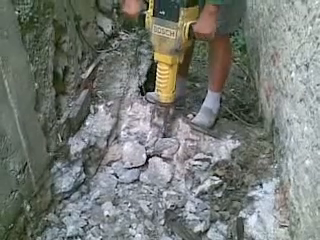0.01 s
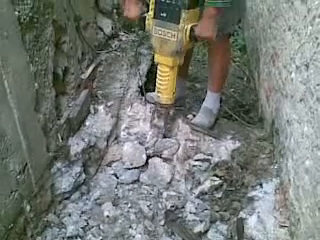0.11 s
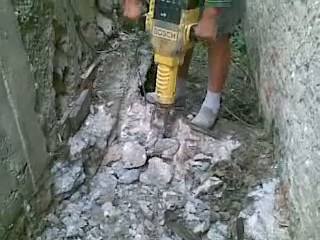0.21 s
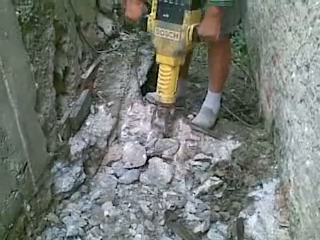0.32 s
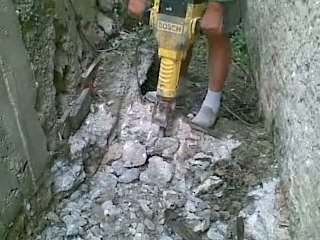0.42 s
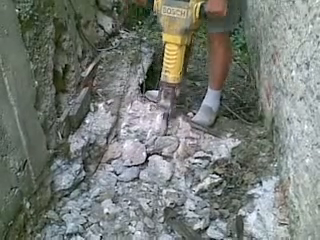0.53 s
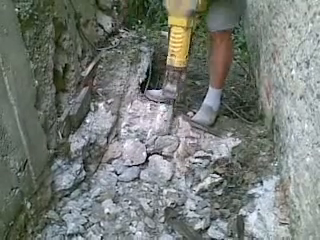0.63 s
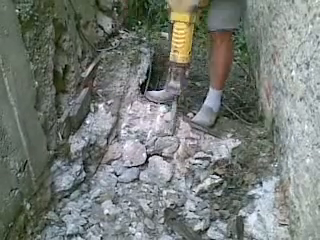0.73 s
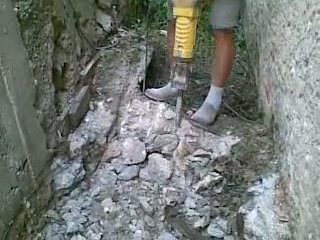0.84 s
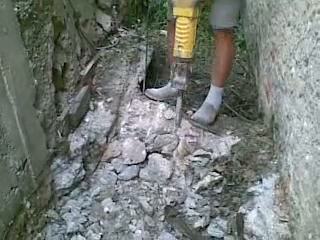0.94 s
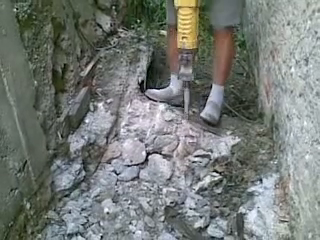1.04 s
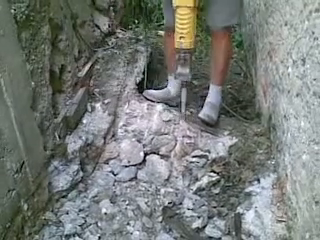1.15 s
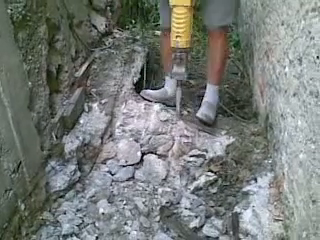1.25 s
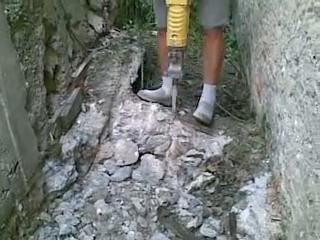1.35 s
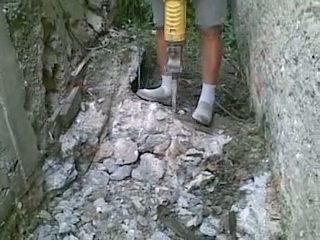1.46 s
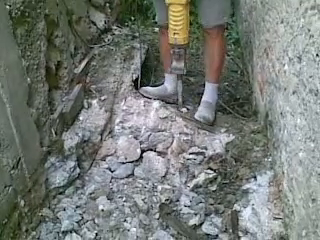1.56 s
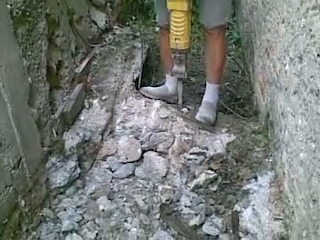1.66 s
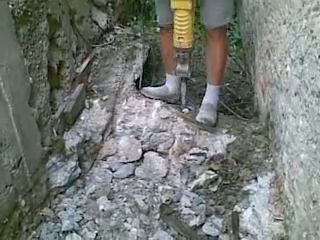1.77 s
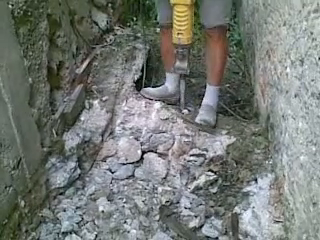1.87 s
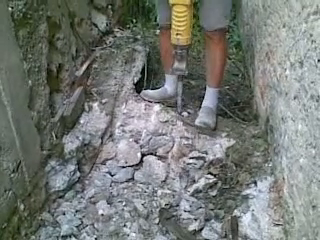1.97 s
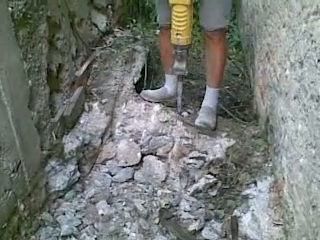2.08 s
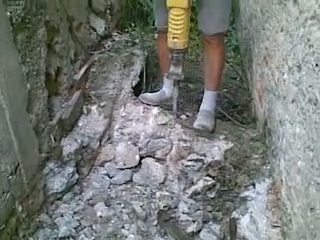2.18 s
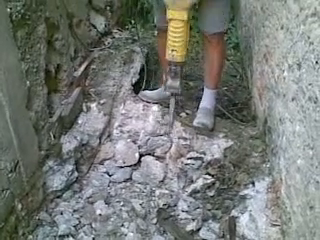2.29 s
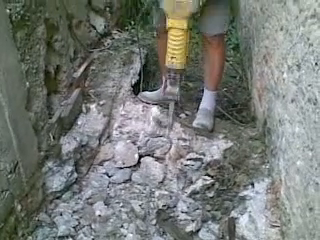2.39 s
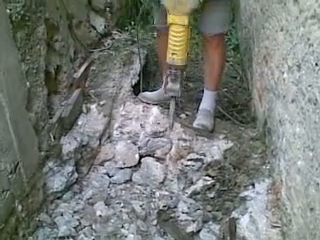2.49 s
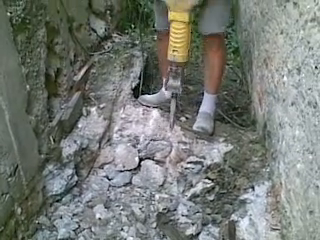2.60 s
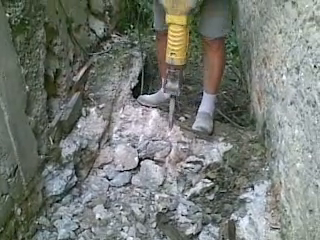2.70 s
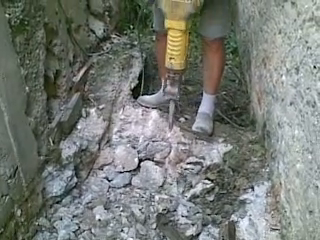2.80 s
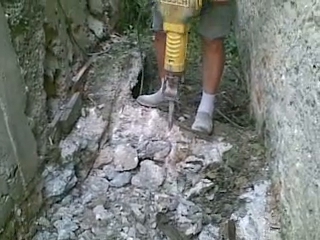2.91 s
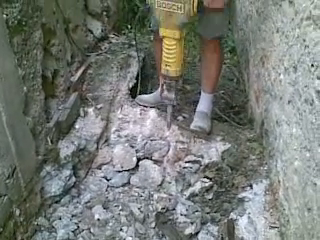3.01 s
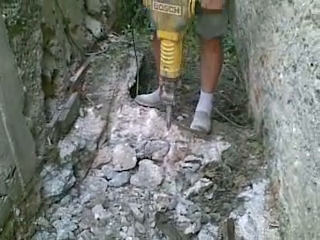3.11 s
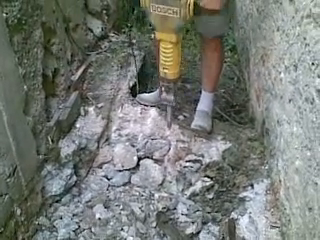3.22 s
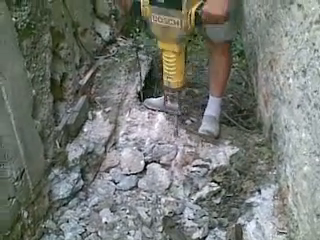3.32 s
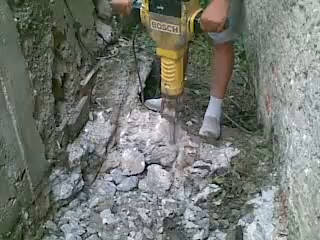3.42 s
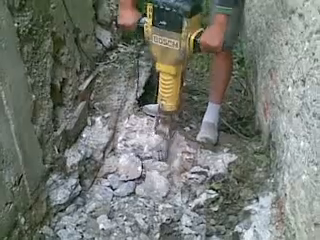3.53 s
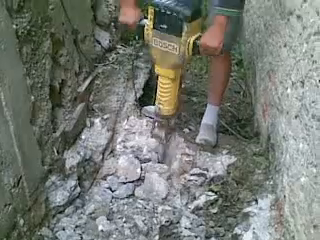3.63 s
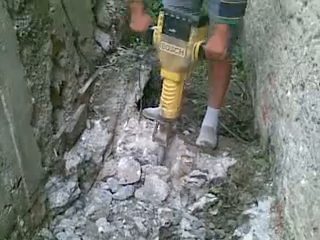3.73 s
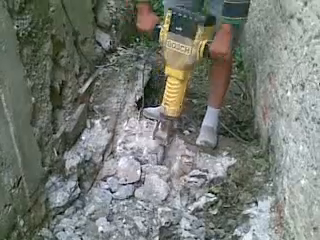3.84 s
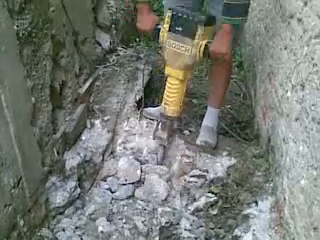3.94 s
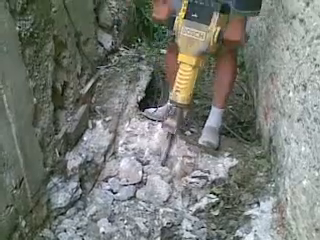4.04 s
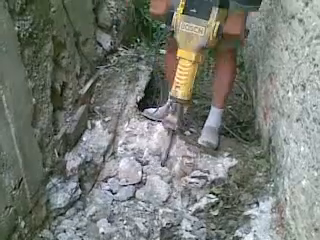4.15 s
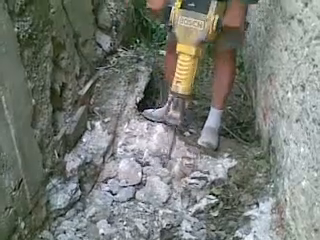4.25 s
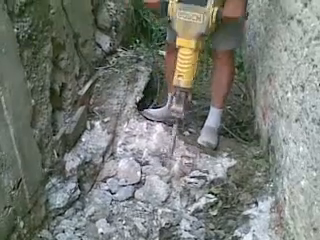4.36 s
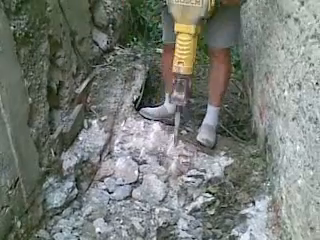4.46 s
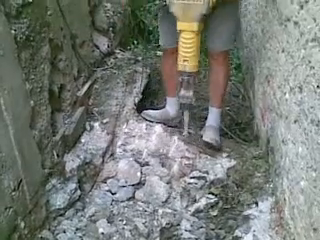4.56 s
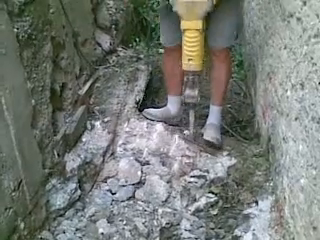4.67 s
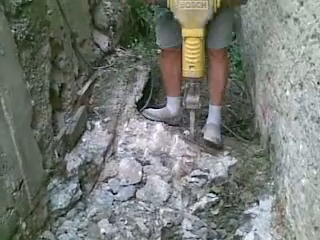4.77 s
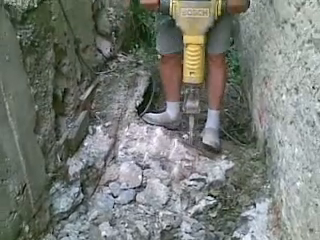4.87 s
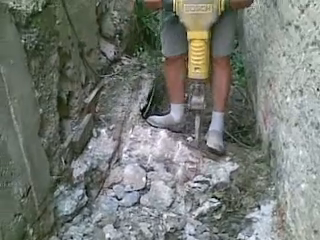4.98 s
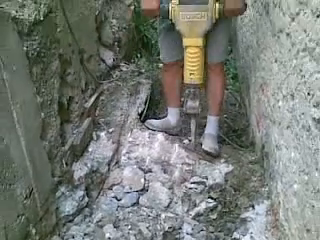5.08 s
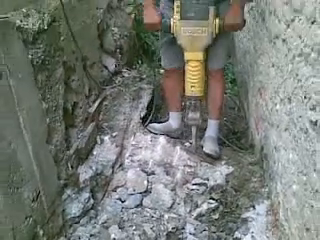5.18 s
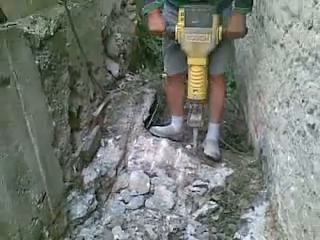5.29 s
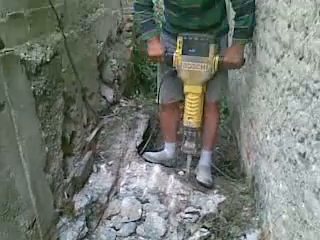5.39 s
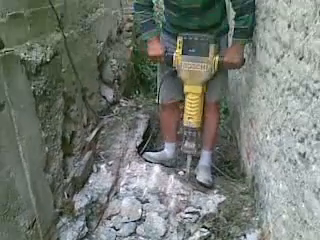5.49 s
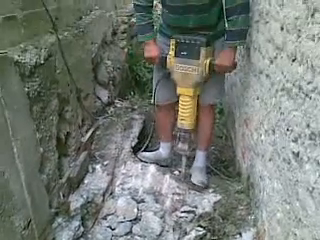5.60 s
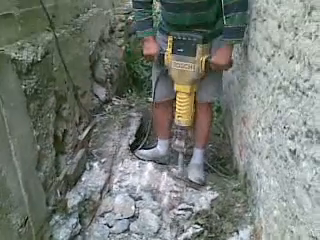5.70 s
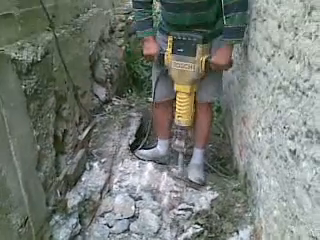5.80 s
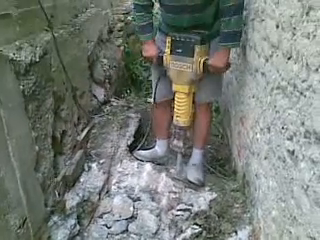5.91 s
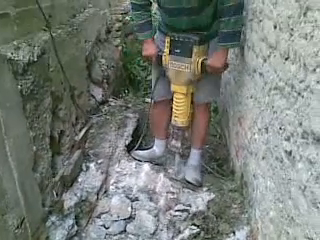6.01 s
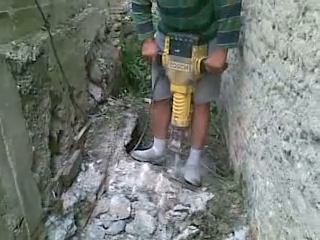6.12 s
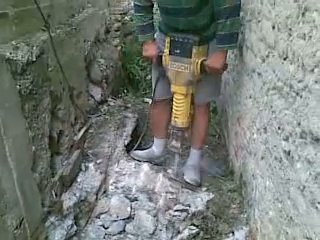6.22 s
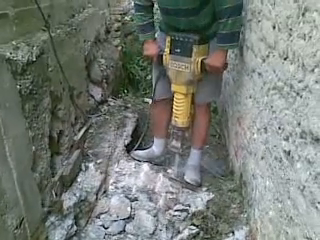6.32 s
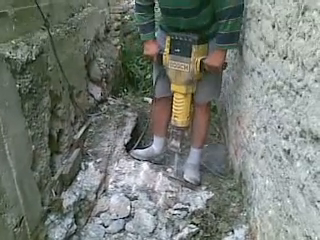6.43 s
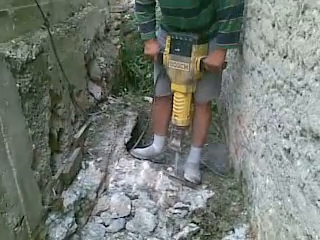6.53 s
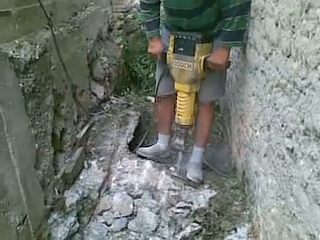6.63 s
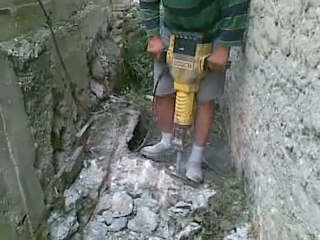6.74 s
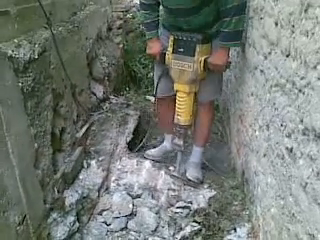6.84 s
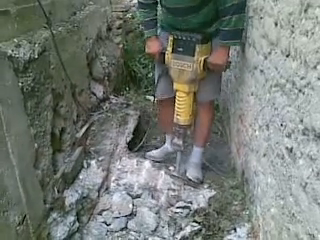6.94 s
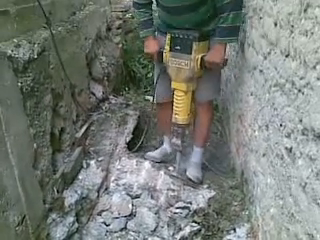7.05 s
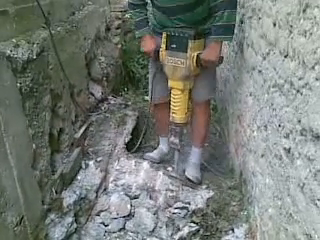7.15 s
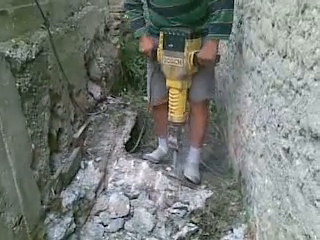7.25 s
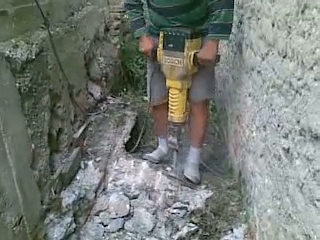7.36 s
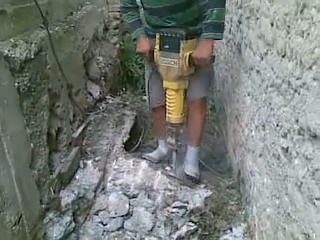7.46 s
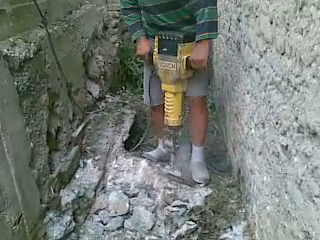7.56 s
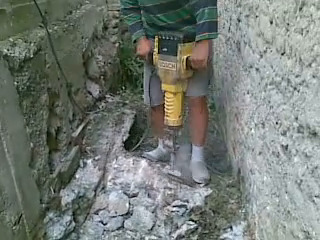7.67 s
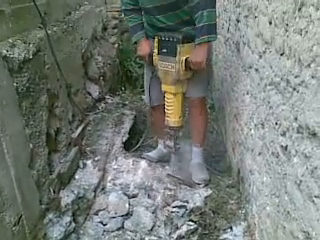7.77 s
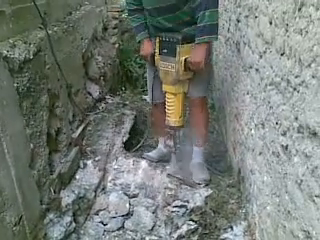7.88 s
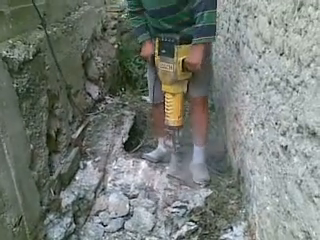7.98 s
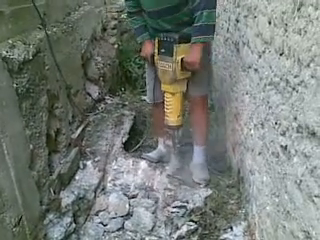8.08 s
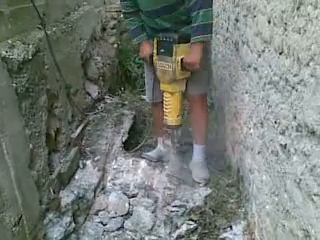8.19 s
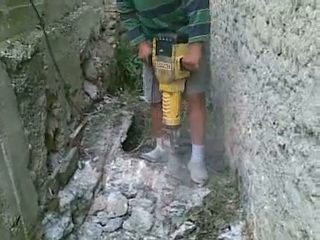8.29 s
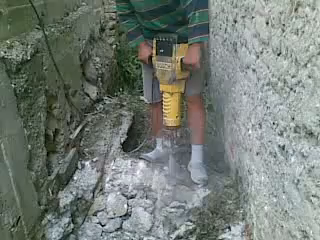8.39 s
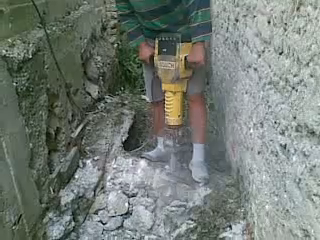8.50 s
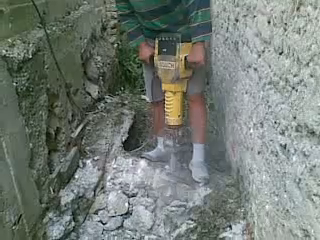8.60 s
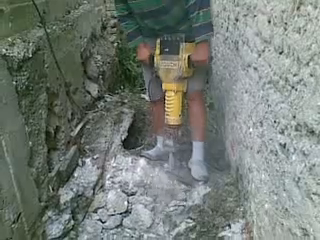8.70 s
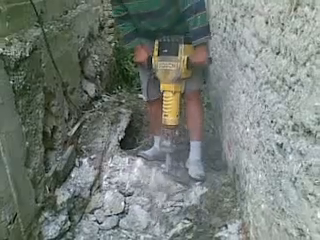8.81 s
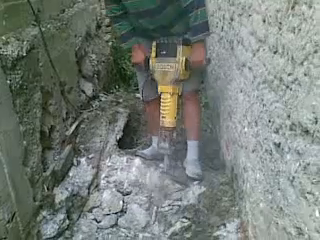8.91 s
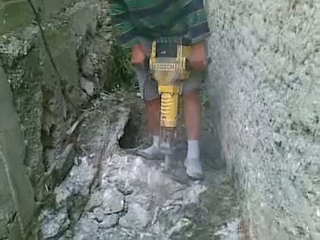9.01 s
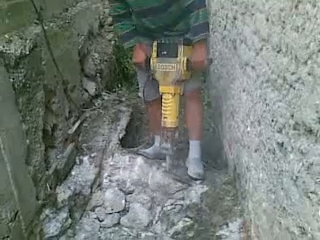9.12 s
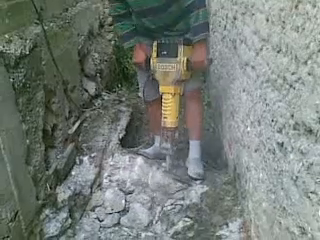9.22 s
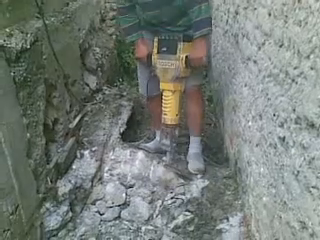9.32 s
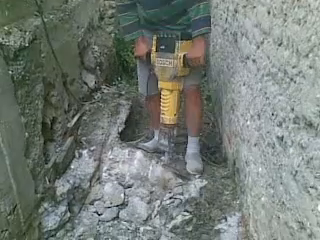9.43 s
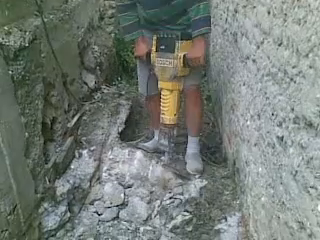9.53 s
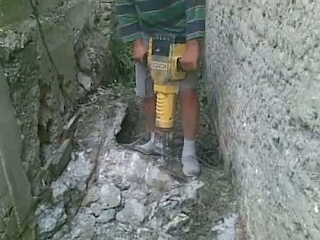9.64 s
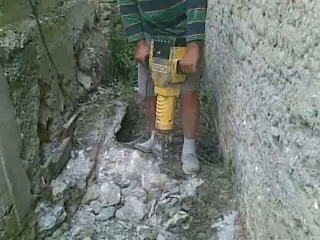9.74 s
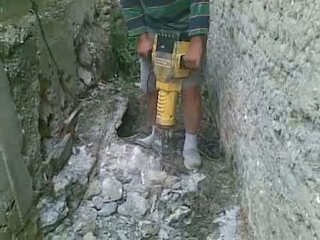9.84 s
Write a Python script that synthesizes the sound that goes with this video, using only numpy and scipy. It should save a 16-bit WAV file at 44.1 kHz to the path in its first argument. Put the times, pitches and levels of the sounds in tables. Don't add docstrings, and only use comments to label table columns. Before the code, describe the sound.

Rapid hammer blows crack rubble and ring a steel bit, the motor sagging and restarting before a sustained pounding run between close walls.

```python
import sys
import numpy as np
from scipy import signal
from scipy.fft import rfft, irfft, next_fast_len
from scipy.io import wavfile
from scipy.ndimage import uniform_filter1d

SR = 44100
rng = np.random.default_rng(int(sys.argv[2]) if len(sys.argv) > 2 else 0)


def master(y):
    cut = np.clip(np.atleast_2d(y).T, -1, 1)
    pcm = np.round(cut * 32767)
    wavfile.write(sys.argv[1], SR, pcm.astype(np.int16))


def natural_amplitude(level_db):
    exponent = np.asarray(level_db, float) / 20
    return 10 ** exponent


N = 438354

# time in seconds, gear mesh in Hz, effort in dB.
MOTOR_RUNS = [
    [(0, 4250, -30), (.2, 4470, -27), (.55, 3550, -29.5), (.85, 2820, -31), (1.6, 1600, -36),
     (2.38, 947, -38), (2.45, 750, -49), (2.93, 700, -57), (3.02, 702.6, -43.5)],
    [(3.155, 800, -39.5), (3.18, 2750, -23), (3.31, 4050, -20.5), (3.39, 3250, -30.5), (3.62, 4100, -32),
     (3.86, 4250, -29.5), (4.22, 3330, -31), (5.15, 1800, -34.5), (5.55, 1100, -41)],
    [(5.58, 2600, -30.5), (5.64, 3300, -27), (5.7, 3950, -24), (5.8, 3830, -31), (8.1, 3830, -35.5),
     (8.83, 3830, -36), (8.95, 4400, -30.5), (9.2, 4500, -31), (9.94, 4450, -29.5)],
]
# frequency in Hz, density in dB per Hz.
ROAR_SPECTRUM = [(110, -21), (170, -22), (315, -2), (409, -20.5), (490, 1.5), (630, -10.5), (800, -1.5),
                 (2040, 4), (3000, -1), (4700, -11), (8000, -26.5)]
# frequency in Hz, density in dB per Hz.
HISS_SPECTRUM = [(2000, -15.5), (3600, -1), (4700, -11), (5900, -3.5), (8400, 0), (10000, -2),
                 (13600, -11.5), (15900, -20.5), (16400, -49)]
# frequency in Hz, density in dB per Hz.
AIR_SPECTRUM = [(25, -9), (312, -15), (2200, -20), (5000, -58), (16000, -45.5)]
# frequency in Hz, density in dB per Hz.
CRACK_SPECTRUM = [(150, -42), (250, -37.5), (469, -6.5), (1490, -5), (2230, -2.5), (3270, -0.5),
                  (4730, -4.5), (8420, -1), (9520, -5), (14700, -5), (16400, -59)]
# frequency in Hz, t60 in seconds.
CRACK_DECAY = [(300, 0.13), (2000, 0.078), (6500, 0.073), (14000, 0.041)]
# frequency in Hz, level in dB, t60 in seconds.
BIT_MODES = [
    [(5155, 0, .4), (4997, -5, .5), (5343, -4, .12), (2760, -2, .1)],
    [(8045, 0, .25), (8240, -4, .25), (8085, -3, .15)],
    [(11475, 0, .2), (11725, -4, .2), (14210, -6, .2), (13203, -13, .2), (15166, -11, .2), (15358, -12, .2)],
]
# frequency in Hz, level in dB, t60 in seconds.
GROUND_MODES = [(63, -2.5, 0.12), (92.6, 2, 0.079), (177.5, 2, 0.13), (254, -0.5, 0.045)]

# time in seconds, blows struck so far, crack in dB, ground thud in dB, high bit ring in dB.
FIRST_BURST = [
    (.147, 0, -30, -48, -56),
    (.197, 1, -19, -33, -50),
    (.417, 5, -23, -36, -56),
    (.53, 7, -28, -58, -56),
    (.594, 8, -33, -64, -55),
    (.759, 10, -24, -59, -60),
    (1.015, 13, -20, -60, -60),
    (1.35, 16, -20, -64, -58),
    (1.492, 17, -22.5, -63, -70),
]
# as in the first burst, in seconds, blows and dB.
SECOND_BURST = [
    (3.329, 0, -16, -31, -34),
    (3.49, 2, -21, -31, -36),
    (3.612, 4, -20, -32, -42),
    (3.898, 9, -20, -38, -36),
    (3.95, 10, -26, -38, -55),
    (4.08, 12, -17, -48, -48),
    (4.35, 16, -22, -53, -55),
    (4.632, 19, -18, -42, -57),
    (4.82, 21, -32, -42, -45),
]
# as in the first burst, in seconds, blows and dB.
LONG_BURST = [
    (5.884, 0, -18, -24, -21),
    (6.271, 6, -17.5, -25, -22),
    (6.583, 11, -16.5, -25, -23),
    (7.205, 21, -17.5, -26, -25),
    (7.579, 27, -20, -31, -24),
    (7.9, 32, -17.5, -24, -27),
    (8.527, 42, -16, -24, -30),
    (8.592, 43, -16.5, -30, -29),
    (8.848, 47, -21, -31, -31),
]
# as in the first burst, in seconds, blows and dB.
LAST_BURST = [
    (9.01, 0, -23.5, -47, -47),
    (9.068, 1, -22, -36, -52),
    (9.12, 2, -19, -32, -48),
    (9.584, 11, -18.5, -32, -47),
    (9.788, 15, -21, -31, -50),
]
# time in seconds, crack in dB, ground thud in dB, high bit ring in dB.
KNOCKS = [(0.034, -39, -36.5, -45), (.104, -35, -55, -55), (1.05, -37, -57, -62), (1.401, -31, -64, -62),
          (1.549, -32, -65, -68), (1.737, -32, -60, -54), (1.789, -33, -62, -68), (1.944, -39, -62, -57),
          (1.667, -17, -40, -62), (1.831, -23.5, -55, -64), (2.261, -21.5, -43, -44),
          (2.302, -28.5, -38.5, -74), (2.542, -21, -50, -66), (3.054, -63, -40, -115),
          (3.124, -35, -40, -92), (3.166, -23, -55, -62), (3.207, -19, -29, -42), (3.265, -29, -53, -44),
          (3.307, -22, -45, -37), (4.884, -29, -47, -49), (4.951, -35, -51, -65), (5.048, -27, -47, -65),
          (5.197, -16, -33, -32.5), (5.42, -18, -30.5, -62), (5.653, -19.5, -25.5, -20.5),
          (5.741, -18.5, -24, -19), (5.81, -21, -27, -19), (8.899, -22, -44.5, -57)]
# time in seconds, crack in dB.
TAPS = [(2.111, -44), (2.667, -44), (2.743, -41.5), (2.791, -46.5), (5.324, -61), (5.571, -34.5),
        (5.917, -23), (7.171, -28.5), (7.236, -23.5), (8.943, -47), (9.85, -35), (9.894, -22)]
# time in seconds, change in dB.
ODD_BLOWS = [(.25, -11), (.3, -2), (.474, 6), (.68, 3), (.936, 1.5), (1.015, -2.5), (8.848, 0),
             (3.546, -2.5), (3.612, 2), (3.671, 1.5), (3.728, -4), (3.785, -4), (3.409, -1), (6.271, 0),
             (6.709, -3), (6.83, 0.5), (7.205, -3), (7.263, 0.5), (7.709, -3), (7.772, -2), (8.657, -1),
             (8.089, -3), (8.153, -2), (8.342, 2.5), (8.726, -2), (8.785, 2), (9.12, 3), (9.482, 2),
             (9.534, -3), (9.634, 2.5)]
# time in seconds, low modes in dB, middle and high modes in dB.
SINGING = [(.594, 21, 4), (5.196, 3, 3.5), (1.668, 1, -12), (2.26, 14, 0), (3.329, 20, 10.5),
           (3.409, 15, 13), (3.671, 7, 2), (3.785, -10, 0), (3.842, 1, 4), (4.08, -20, 0), (4.148, -18, 4),
           (4.214, 3, 2), (4.35, 7, 0), (4.441, 10.5, -4), (6.271, 3, 2.5), (6.396, 9.5, 1),
           (6.955, 9.5, 2), (7.018, -12, -3), (7.332, -16, -4), (7.579, 2, 5), (7.644, -13, -5),
           (8.214, 6.5, 4), (8.277, -11.5, -8), (8.402, -11, -4), (8.848, -7, 4), (9.225, 2, 9),
           (9.33, -3, 10), (9.534, 0, -8), (9.688, 9.5, 14), (9.788, 8, 10)]
# crack, thud, low, middle and high ring, in dB.
SCATTER_DB = [0.69, 2, 4.3, 1.85, 2.8]
ODD_SHARE = [1.33, 0.36, 1.2, 1.7, 1.06]

FREE_DB = -45


def evened(x):
    return x / np.sqrt(np.mean(x ** 2) + 1e-20)


def read(points, hz):
    f, value = np.transpose(points)
    return np.interp(np.log(hz + 1), np.log(f + 1), value)


def curve(rows):
    s, *columns = np.transpose(rows)
    return [np.interp(np.arange(N) / SR, s, c) for c in columns]


def add(mix, s, sound):
    part = mix[round(s * SR):][:len(sound)]
    part += sound[:len(part)]


def coloured(x, spectrum):
    size = next_fast_len(len(x))
    gain = natural_amplitude(read(spectrum, np.fft.rfftfreq(size, 1 / SR)))
    return evened(irfft(rfft(x, size) * gain, size)[:len(x)])


def wander(span_s):
    size = round(span_s * SR)
    smooth = uniform_filter1d(rng.standard_normal(N), size)
    return evened(uniform_filter1d(smooth, size))


def patchy(x, patch_db):
    z = signal.stft(x, nperseg=256)[2]
    patches = rng.standard_normal(z.T.shape).T
    patches = uniform_filter1d(patches, size=3, axis=0)
    patches = uniform_filter1d(patches, size=9, axis=1)
    return evened(signal.istft(z * natural_amplitude(patch_db * evened(patches)), nperseg=256)[1][:N])


def strikes():
    beats = []
    for burst in (FIRST_BURST, SECOND_BURST, LONG_BURST, LAST_BURST):
        s, turns, *levels = np.transpose(burst)
        turns = np.round(turns)
        each_turn = np.arange(turns[-1] + 1)
        beats.append(np.transpose([np.interp(each_turn, turns, c) for c in (s, *levels)]))
    beats = np.vstack(beats)
    taps = [(s, db, db - 16, db - 24) for s, db in TAPS]
    s, crack, thud, high = np.vstack([beats, KNOCKS, taps]).T
    free = thud < FREE_DB
    low = np.where(free, crack - 20, -31 + 0.45 * (high + 25))
    middle = np.where(free, high + 11, -22 + 0.42 * (high + 24))
    odd_db = sum(db * (abs(s - at) < .012) for at, db in ODD_BLOWS)
    on_beat = (np.arange(len(s)) < len(beats))[:, None]
    chance = rng.standard_normal((len(s), 5)) * on_beat
    levels = np.transpose([crack, thud, low, middle, high])
    levels = levels + odd_db[:, None] * ODD_SHARE + chance * SCATTER_DB
    for at, low_db, upper_db in SINGING:
        levels[abs(s - at) < .012, 2:] += [low_db, upper_db, upper_db]
    return np.column_stack([s, levels])[np.argsort(s)]


def crank(blows):
    return np.interp(np.arange(N) / SR, blows[:, 0], np.arange(len(blows))) % 1


def controls(blows, fan_db=-30.5, fan_power=1.36, effort_share=0.44, grit=0.16, surge=1,
             whine_db=-5, mesh_hz=2800, fade_db_per_hz=3, light_load_db=10, full_load_db=19):
    hz, effort_db = curve(sum(MOTOR_RUNS, []))
    thud_db = curve(blows[:, [0, 2]])[0]
    lean_db = uniform_filter1d(np.maximum(thud_db - FREE_DB, 0), size=6000)
    hiss_db = fan_db + fan_power * 20 * np.log10(hz / 4000)
    hiss_db = hiss_db + effort_share * (effort_db + 28.5) + grit * lean_db
    whine_db = hiss_db + whine_db - fade_db_per_hz * np.maximum(mesh_hz - hz, 0)
    whine_db = whine_db - .004 * np.maximum(hz - 3900, 0)
    hiss_db = hiss_db + surge * np.maximum(effort_db + 27.5, 0) * (hz / 4000) ** 2
    load = np.clip((lean_db - light_load_db) / (full_load_db - light_load_db), 0, 1)
    return hz, effort_db, hiss_db, whine_db, load


def quiet_air(level_db=-51.5):
    return natural_amplitude(level_db + 1.5 * wander(.05)) * coloured(rng.standard_normal(N), AIR_SPECTRUM)


def motor(blows, rattle_per_s=6000., rattle_db=-0.5, flicker_db=1.5, roar_throb_db=0.5, hiss_throb_db=2.0):
    hz, roar_db, hiss_db, *_ = controls(blows)
    size = natural_amplitude(rattle_db * np.minimum(rng.exponential(1, N), 3))
    rattle = rng.standard_normal(N) * size * (rng.random(N) < rattle_per_s / SR)
    drive = patchy(evened(rattle) + 1.6 * rng.standard_normal(N), patch_db=2.5)
    depth = np.clip(1.2 * 4000 / hz, 1, 2.5)
    throb = depth * np.cos(2 * np.pi * (crank(blows) - .05))
    roar_db = roar_db + roar_throb_db * throb + flicker_db * wander(0.013)
    hiss_db = hiss_db + hiss_throb_db * throb + 2.2 * wander(.012)
    return natural_amplitude(roar_db) * coloured(drive, ROAR_SPECTRUM) + natural_amplitude(hiss_db) * coloured(drive, HISS_SPECTRUM)


def gears(blows, wobble=.02, sag=.05, half_db=-2., swell_db=6.5):
    hz, _, _, whine_db, load = controls(blows)
    angle = 2 * np.pi * crank(blows)
    sway = sag * load * np.cos(angle - 4.1)
    jitter = wobble * (.85 + 0.16 * load) * wander(0.001505)
    turns = np.cumsum(hz * (1 + sway + jitter)) / SR
    tones = np.zeros(N)
    for ratio, db in ((.5, half_db - 2.1 * (1 - load)), (1, 0.5), (1.59, -6)):
        tones += natural_amplitude(db + 3.8 * wander(0.007)) * np.sin(2 * np.pi * ratio * turns)
    return natural_amplitude(whine_db + swell_db * load * np.cos(angle - 5.6)) * tones


def cracks(blows, patch_db=2.5, rise_s=0.0021, lead_s=.002, chips_db=1.5, low_hz=278.0, free_tilt_db=-8.0):
    hz = np.fft.rfftfreq(128, 1 / SR)[:, None]
    t = np.arange(110) * 32 / SR
    out = np.zeros(N)
    shape_db = read(CRACK_SPECTRUM, hz) - 60 * t / read(CRACK_DECAY, hz)
    for s, crack_db, thud_db, *_ in blows:
        dull_db = free_tilt_db * hz / 8000 * (thud_db < FREE_DB)
        a, b, patches = rng.standard_normal((3, 65, 110))
        patches = uniform_filter1d(patches, size=3, axis=0)
        patches = evened(uniform_filter1d(patches, size=25, axis=1))
        grains = (a + 1j * b) * natural_amplitude(shape_db + dull_db + patch_db * patches)
        burst = signal.istft(grains, nperseg=128, noverlap=96)[1]
        age = np.arange(len(burst)) / SR
        chips = evened(uniform_filter1d(rng.standard_normal(len(burst)), size=40))
        burst = burst * (1 - np.exp(-(age / rise_s) ** 2)) * natural_amplitude(chips_db * chips)
        add(out, s - lead_s, natural_amplitude(crack_db) * burst / np.sqrt(np.mean(burst[:530] ** 2)))
    return signal.sosfilt(signal.butter(4, low_hz, "high", fs=SR, output="sos"), out)


def bit_ring(blows, bounce_s=.024, free_s=0.015, grip_t60=0.18, rise_s=0.00071, chatter_db=3.0):
    t = np.arange(4400) / SR
    out = np.zeros(N)
    rise = 1 - np.exp(-t / rise_s)
    grips = [rise * natural_amplitude(-60 * np.maximum(t - k * free_s, 0) / grip_t60) for k in (1.5, 1.1, 1)]
    for s, _, thud_db, *rings_db in blows:
        knocks = np.zeros(len(t))
        knocks[(SR * bounce_s * rng.random(5)).astype(int)] = rng.uniform(-0.68, 1.0, 5)
        knocks[0] = 1
        for ring_db, modes, grip in zip(rings_db, BIT_MODES, grips):
            hz, db, t60 = np.transpose(modes)[:, :, None]
            db = db + 14 * (hz == 4997) * (thud_db < FREE_DB)
            detune, spread = rng.standard_normal((2, len(modes), 1))
            waves = np.sin(2 * np.pi * hz * (1 + .0015 * detune) * t)
            tones = (natural_amplitude(db + 4 * spread - 60 * t / t60) * waves).sum(0)
            chatter = evened(uniform_filter1d(rng.standard_normal(len(t)), size=90))
            ring = signal.fftconvolve(knocks, tones)[:len(t)] * grip * natural_amplitude(chatter_db * chatter)
            add(out, s - .001, natural_amplitude(ring_db) * ring / np.sqrt(np.mean(ring[220:1540] ** 2)))
    return out


def thuds(blows, late_s=0.01358, swell_s=0.0084, detune=0.055, front_db=-6.5, front_hz=519.0):
    age = np.arange(5000) / SR
    out = np.zeros(N)
    t = age - late_s
    hz, db, t60 = np.transpose(GROUND_MODES)[:, :, None]
    swell = np.exp(-(np.minimum(t, 0) / swell_s) ** 2)
    falling = 2 * np.pi * np.cumsum(200 + (front_hz - 200) * np.exp(-age / 0.0042)) / SR
    for s, _, thud_db, *_ in blows:
        shift, spread = rng.standard_normal((2, len(GROUND_MODES), 1))
        decay = natural_amplitude(db + 1.4 * spread - 60 * np.maximum(t, 0) / t60)
        modes = decay * np.cos(2 * np.pi * hz * (1 + detune * shift) * t)
        wave = -swell * modes.sum(0)
        front = natural_amplitude(front_db + 3.1 * spread[0] - 60 * age / 0.06) * np.sin(falling)
        add(out, s - .002, natural_amplitude(thud_db) * (wave / np.sqrt(np.mean(wave[350:970] ** 2)) + front))
    return out


def trench(x, t60=0.27, wet_db=-12.0):
    at = np.arange(200, 9000, 22)
    taps = np.zeros(9100)
    decay = natural_amplitude(-60 * at / SR / t60)
    taps[at + rng.integers(0, 22, len(at))] = rng.choice([-1., 1.], len(at)) * decay
    return x + natural_amplitude(wet_db) * signal.oaconvolve(x, taps / np.linalg.norm(taps))[:N]


def scene():
    blows = strikes()
    hammer = motor(blows) + gears(blows) + cracks(blows) + bit_ring(blows)
    return (quiet_air() + trench(hammer) + thuds(blows))[None]


def low_pass(x):
    return signal.sosfilt(signal.butter(12, 16530, fs=SR, output="sos"), x)


def record(dry, ceiling=0.55):
    rounded = ceiling * np.tanh(dry / ceiling)
    return low_pass(rounded)


dry = scene()
out = record(dry)
master(out)
```